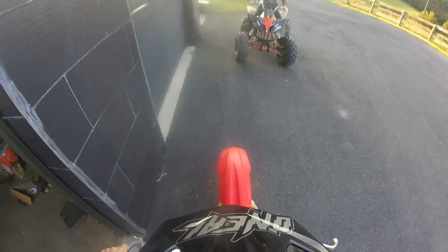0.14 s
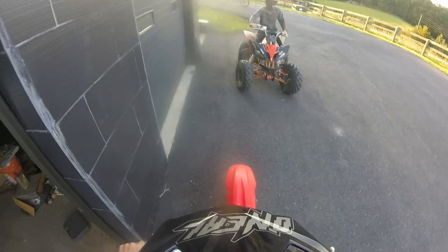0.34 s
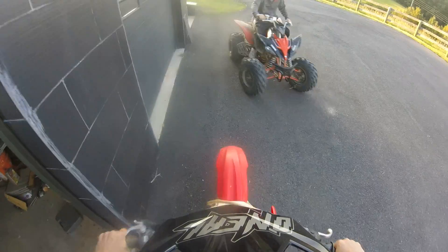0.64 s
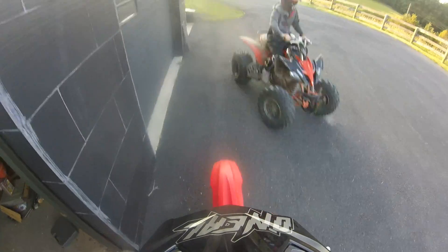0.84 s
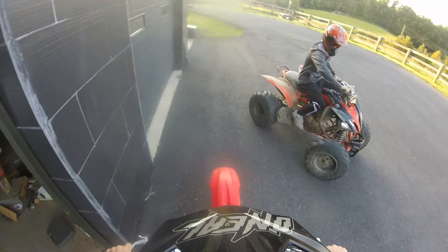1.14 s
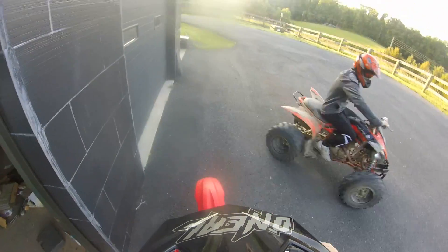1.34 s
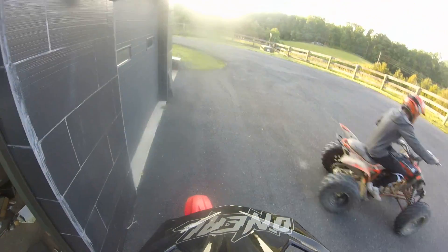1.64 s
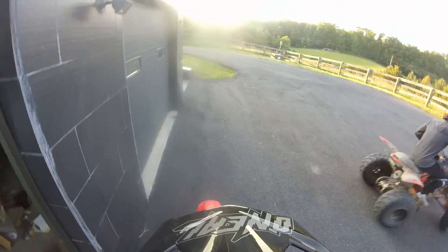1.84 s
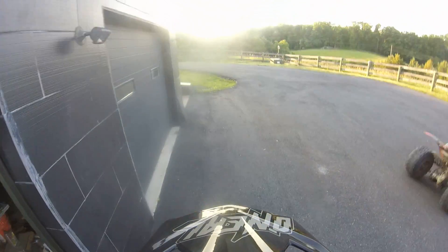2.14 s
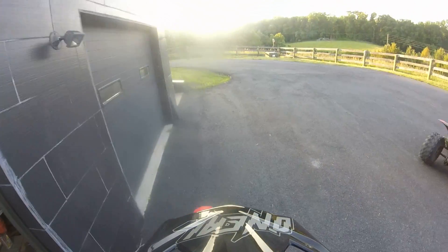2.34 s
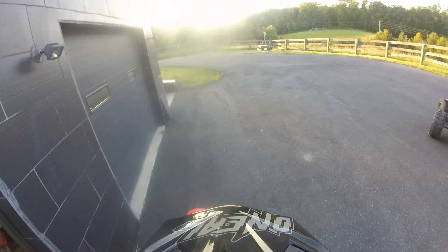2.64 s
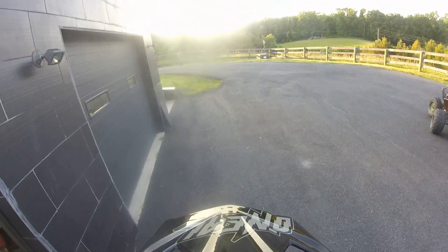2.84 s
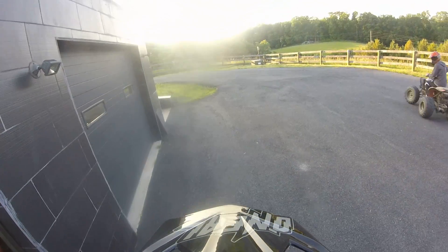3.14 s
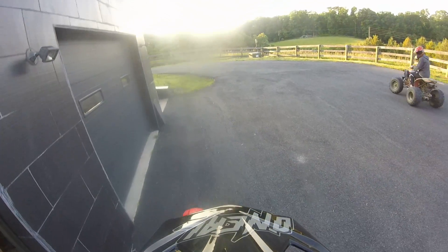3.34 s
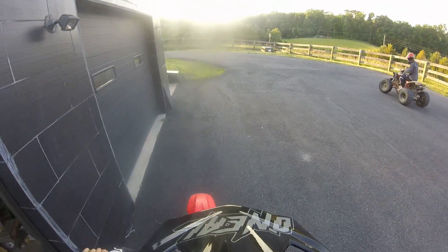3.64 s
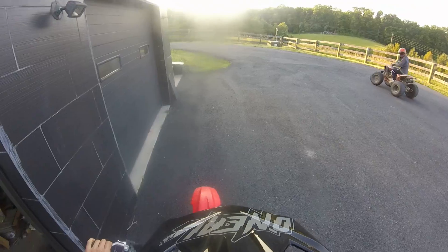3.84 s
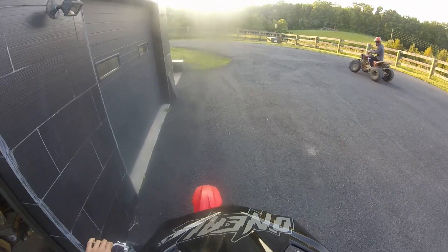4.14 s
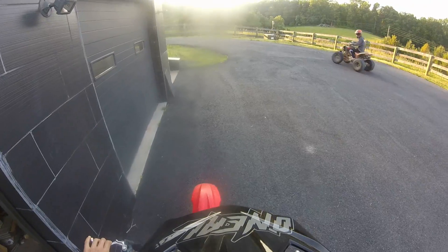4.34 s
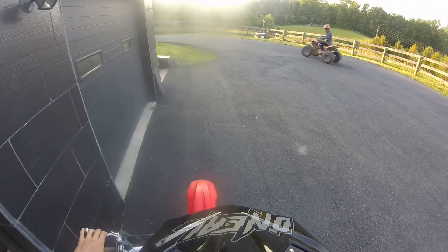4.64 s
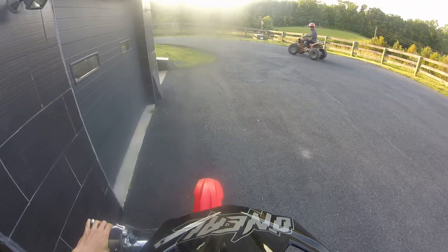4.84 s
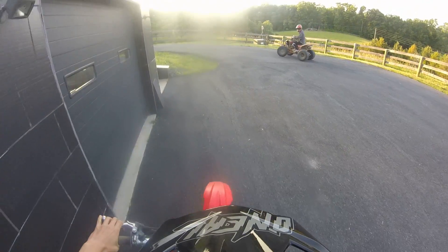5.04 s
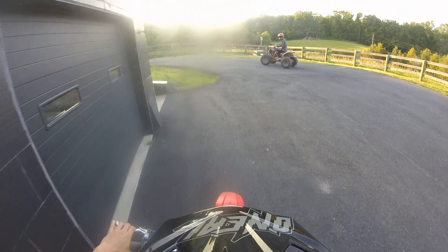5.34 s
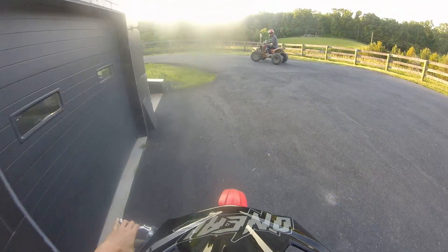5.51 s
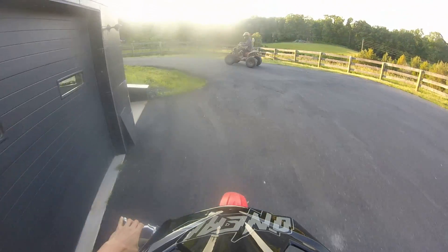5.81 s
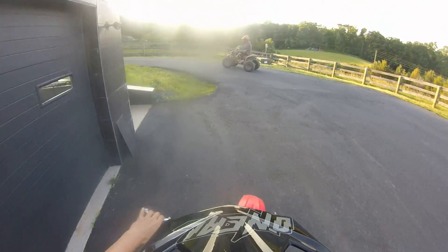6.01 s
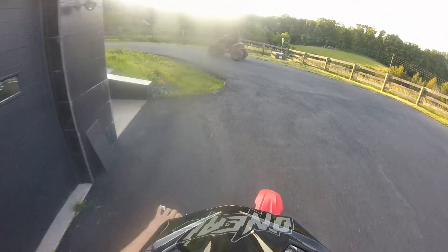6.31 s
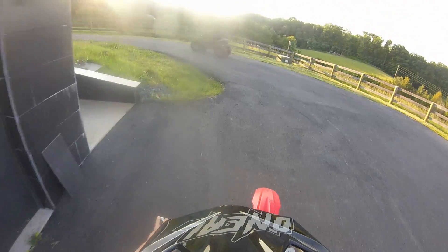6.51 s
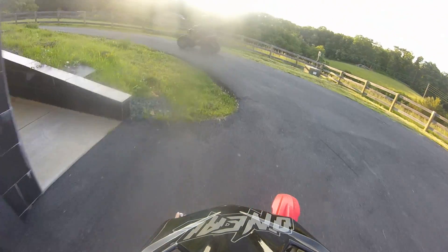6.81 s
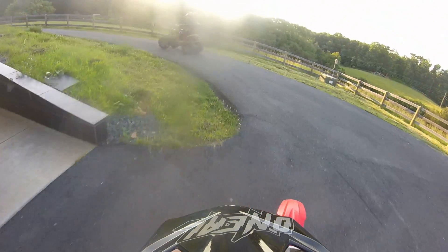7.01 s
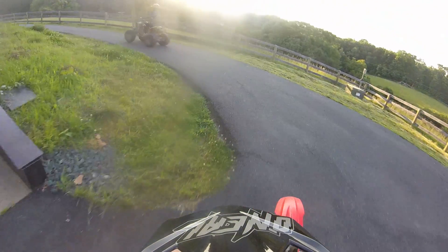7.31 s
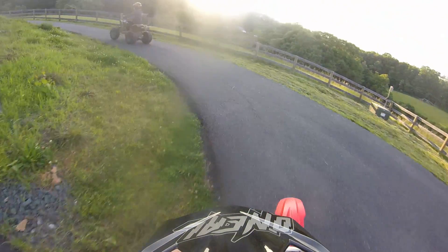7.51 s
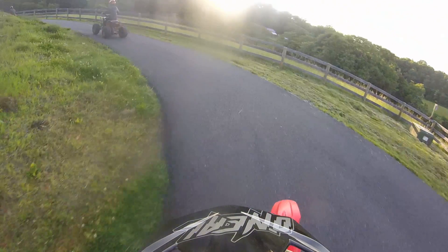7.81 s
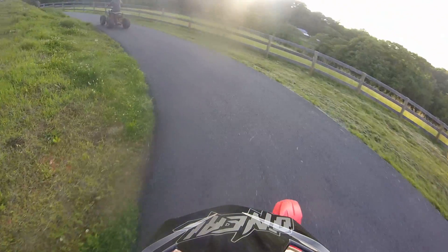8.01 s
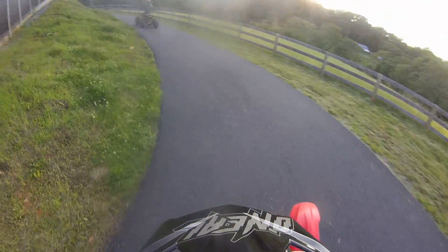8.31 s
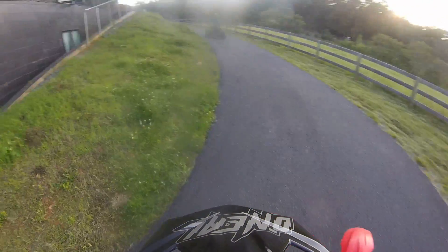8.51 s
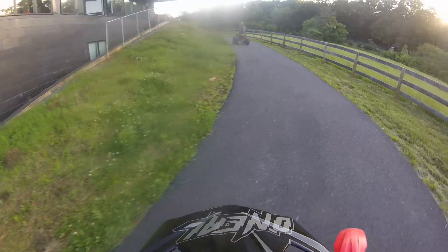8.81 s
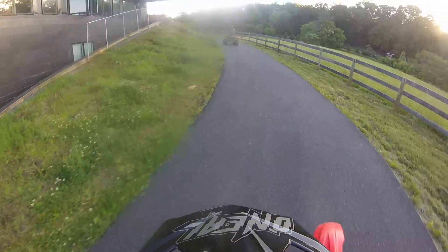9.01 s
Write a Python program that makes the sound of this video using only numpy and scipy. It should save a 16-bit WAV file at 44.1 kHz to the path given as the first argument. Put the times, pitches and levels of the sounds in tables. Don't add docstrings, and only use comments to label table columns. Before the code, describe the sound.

Close, boxy sound from a helmet camera in a sealed housing, beside a wall outdoors. From 0 s a quad thrums low and throbs with clatter and a faint rising whir; tiny cricket chirps at 0.2 and 0.6 s. Lever clanks at 0.1 to 0.5 s, then kick hits from 0.9 s. At 1.0 s the single-cylinder dirt bike fires, with a big blip at 1.2 s, then sags toward a stall while the quad passes, loudest near 1.7 s. A small blip at 2.35 s, a sharp backfire at 2.44 s, a big blip at 2.6 s, a pedal thud near 3 s. From 3.3 s the engine pulls away, growling and knocking with hollow ringing clatter, rising around 4.2 s and again near 6 s; wall echo fades by 7 s. Faint rapid chain slaps 7 to 8.2 s as the engine eases, misfiring, and from 8.4 s it pulls again until the cut. Soft movement thumps throughout.

```python
import sys
import numpy as np
from scipy import signal
from scipy.io import wavfile
from scipy.ndimage import uniform_filter1d

SR = 44100
rng = np.random.default_rng(int(sys.argv[2]) if len(sys.argv) > 2 else 0)


def elevation(decibels):
    levels = np.asarray(decibels, float)
    return 10 ** (levels / 20)


def store_wav(level_fs):
    pcm = np.round(np.clip(np.atleast_2d(level_fs), -1, 1) * 32767)
    wavfile.write(sys.argv[1], SR, pcm.T.astype(np.int16))


N = 403956
T = np.arange(N) / SR

# t/s, starting f/Hz, level/dB
CHIRPS = [
    (.193, 4370, -60),
    (.608, 4420, -56),
]
# t/s, exhaust thrum f/Hz, nearness level/dB
QUAD = [(0, 93.5, -3.5), (.3, 94, -1.6), (1, 105.5, -1), (1.7, 102, 3), (2.2, 99.2, -5), (3, 112.6, -8)]
# t/s, level/dB
MOVEMENTS = [(.01, -43), (.28, -27), (.92, -25.5), (1.25, -35), (1.879, -32.5), (2.401, -37), (3.09, -31),
             (4.2, -49), (5.7, -55), (6.78, -40), (7.12, -53), (7.37, -52), (8.01, -47), (8.49, -37),
             (8.75, -48), (9.15, -39)]
# t/s, peak level/dB, fizz level/dB re peak, low knock level/dB re peak, time to fall 60 dB/s
HITS = [
    (0.08, -36.5, -16, -27, 0.056),
    (0.2375, -34.5, -14, -17, 0.15),
    (0.3316, -27, -13, -32, 0.18),
    (0.457, -35, -13, -25, 0.13),
    (0.8837, -30.5, -17, -18, 0.036),
    (0.9065, -30, -17, -30, 0.094),
    (0.9921, -21, -15, -31, 0.11),
    (2.374, -32, -22, -20, 0.13),
    (2.439, -27, -16, -25, .07),
    (2.962, -32.5, -7, 3.5, 0.19),
]
# t/s, slaps per second/Hz, level/dB
CHAIN = [(6.7, 33.5, -95), (6.95, 34.6, -62), (7.2, 35.5, -49), (7.4, 38, -47), (7.7, 41.5, -48),
         (7.9, 43, -52), (8.05, 43.5, -49), (8.2, 43.8, -66), (8.4, 44, -95)]
# f/Hz, width/Hz, level/dB
CHAIN_RING = [(8300, 1000, -1), (11500, 1500, -13), (6000, 900, 1), (14300, 1200, -24), (3450, 700, 12),
              (7000, 700, -3)]
# t/s, level/dB
BACKFIRE = [
    (2.4382, -21),
    (2.4432, -15.5),
    (2.466, -28),
]
# f/Hz, width/Hz, level/dB
BACKFIRE_RING = [(1349, 150, -1), (1570, 200, -5), (690, 410, -13), (2610, 850, -15)]

# f/Hz, level/dB
HOUSING = [(300, -14.5), (700, -11), (1050, -17), (1250, -9.5), (1380, 0), (1540, -3.5), (1700, -9.5),
           (2070, -16.5), (2500, -8.5), (2700, -9.5), (3050, -11.5), (3900, -22), (4700, -37), (16000, -99)]
# f/Hz, level/dB
HOUSING_TOP = [(2000, -70), (3600, -3), (4600, -9), (5200, -7.5), (5900, 4.5), (6600, -4.5), (8200, -7),
               (9500, -11), (12000, -20.5), (15000, -32), (16000, -84)]
# f/Hz, level/dB
HOUSING_CLANK = [(300, -18.5), (850, -16.5), (1100, -17), (1450, 0), (1700, -12.5), (2050, -20),
                 (2480, -5.5), (2750, -8), (3050, -4), (3400, -14.5), (3850, -12.5), (4300, -28),
                 (5000, -66), (16000, -99)]

# opening t/s, held/s, exhaust level/dB, clatter level/dB, speed gain/Hz
BLIPS = [
    (0.991, 0.091, -27.5, -31, 10.3),
    (1.226, 0.079, -20.5, -19.5, 31),
    (2.355, .11, -29.5, -39, 13),
    (2.615, 0.081, -23, -27.5, 30.8),
]
# start t/s, length/s
PULLS = [
    (3.32, 4.42),
    (8.385, 1.2),
]
# t/s, firings per second/Hz
RIDE_SPEED = [(3.36, 32.96), (3.55, 43.47), (3.97, 43.95), (4.25, 51.05), (4.75, 46.82), (5.05, 47.72),
              (5.56, 47.38), (5.77, 52.25), (6.1, 55.91), (6.56, 54.94), (6.93, 51.3), (7.25, 53.1),
              (7.76, 48.94), (8.1, 40.3), (8.4, 41.65), (8.59, 43.5), (8.68, 38.22), (9.16, 41.22)]
# t/s, level/dB
EFFORT = [(3.36, -0.5), (4, -0.5), (4.3, 0), (5.4, -0.5), (5.7, 0.2), (6.4, 0), (6.8, 0.5), (7.7, -0.5),
          (8.2, -2), (9.16, -1.5)]
# t/s, level/dB
ROAD_RUSH = [(3.4, -2), (5.3, -1), (5.8, 3), (6.6, 1.5), (7.2, -0.5), (8.2, -0.5), (9.16, -1.5)]
# t/s, level/dB
MISFIRES = [(3.128, -8), (3.232, -9), (3.709, -16), (3.857, -12), (3.88, -12), (4.045, -6), (4.13, -9),
            (4.315, -8), (4.897, -9), (4.939, -12), (7.827, -11), (7.982, -7), (8.045, -9), (8.103, -9),
            (8.154, -10)]
# f/Hz, level/dB
PIPE_SHUT = [(40, -55), (70, -30), (110, 2), (150, 8), (190, 9.5), (260, -6), (330, -32), (420, 0),
             (1500, -99)]
# f/Hz, level/dB
PIPE_UPPER = [(250, -39), (400, -16), (470, 7), (530, 0), (590, -5), (690, -3), (790, -6), (940, 2.5),
              (1050, -15), (2500, -99)]
# f/Hz, width/Hz, level/dB
HONK = [(238.7, 29, 4.5), (310, 28, -2), (292, 80, -2)]
# f/Hz, width/Hz, level/dB
KNOCK = [(1393, 75, 11), (1530, 115, 11.5), (2630, 330, -7.5)]
ORDER_SPEEDS = [42, 47.5, 51.8, 55]
# multiple of the firing rate, level/dB
ORDERS_SLOW = [(1, -13), (2, -5), (3, -14), (4, -2), (5, 0), (6, -2), (7, -7), (8, -16), (9, -11),
               (10, -11), (11, -15), (12, -14.5), (13, -12.5), (14, -15.5), (15, -17.5), (16, -25),
               (17, -18.5), (18, -21), (19, -20), (20, -21)]
ORDERS_MID = [(1, -7), (2, -6), (3, -102), (4, 2.5), (5, 5.5), (6, 3.5), (7, 0.5), (8, -10.5), (9, -8),
              (10, 1.5), (11, -7), (12, -9), (13, -58), (14, -1), (15, -2), (16, -12), (17, -14), (18, -36),
              (19, -13.5), (20, -12)]
ORDERS_BRISK = [(1, -8), (2, -6), (3, -54), (4, 4.5), (5, 1.5), (6, 9.5), (7, -5.5), (8, -5.5), (9, 3),
                (10, 9), (11, -22), (12, -5), (13, -7.5), (14, 3), (15, 2), (16, -7), (17, -5.5), (18, -14),
                (19, -17), (20, -38)]
ORDERS_FAST = [(1, -3), (2, -13), (3, -22.5), (4, 4), (5, 2), (6, -7), (7, -7), (8, -20), (9, 6.5),
               (10, -3.5), (11, -26), (12, -1), (13, -4.5), (14, -16), (15, -32), (16, -25), (17, -5),
               (18, -7), (19, -8), (20, -30)]
# f/Hz, level/dB
FRAME = [(30, -57), (40, -56), (47, -41), (55, -37), (70, -45), (86, -41), (101, -44.5), (111, -58)]
# t/s, level/dB
SHAKE_DIPS = [(2.799, -12), (3.54, -4), (4.09, -5), (4.82, -28), (6.91, -29)]
# t/s, level/dB
WALL = [(1, -14), (4.3, -14.5), (5, -7.5), (6.55, -7.5), (6.95, -16), (7.5, -24.5)]

COASTING, BLIPPING, PULLING = (.25, .17, .04, .27), (.9, .6, .93, .35), (.97, .05, .008, .25)
# when lugging at low speed, off the throttle in gear, per Hz above 35 Hz out of gear
LUGGING, OVERRUN, FREE_PER_HZ = (0, .05, .012, .45), (.3, .16, .02, .2), (.008, .004, .003, 0)
CLUTCH_S, CRANK_AT_CLUTCH = 3.36, .11


def evened(x):
    return x / np.sqrt(np.mean(x ** 2) + 1e-20)


def ramp(x):
    return np.clip(x, 0, 1)


def curves(rows):
    s, *columns = np.transpose(rows)
    return [np.interp(T, s, column) for column in columns]


def noise():
    return rng.standard_normal(N)


def clicks(at, size):
    return np.bincount(np.clip(at, 0, N - 1).astype(int), size, N)


def colour(x, points):
    hz, db = np.transpose(points)
    bins = abs(np.fft.fftfreq(16384, 1 / SR))
    log_gain = np.log(elevation(np.interp(np.log(bins + 1), np.log(hz), db)))
    taps = np.fft.ifft(np.exp(np.conj(signal.hilbert(log_gain)))).real[:4096]
    return signal.oaconvolve(x, taps / np.linalg.norm(taps))[:len(x)]


def resonate(x, hz, width):
    turn = np.exp(2j * np.pi * np.cumsum(hz * np.ones(len(x))) / SR)
    r = np.exp(-np.pi * width / SR)
    smooth = signal.lfilter([(1 - r) ** 2], [1, -2 * r, r * r], x / turn)
    return 2 * (turn * smooth).real


def ring_all(x, tones):
    return evened(sum(elevation(db) * resonate(x, hz, width) for hz, width, db in tones))


def cricket():
    out = np.zeros(N)
    t = np.arange(round(.117 * SR)) / SR
    notes = np.sin(np.pi * 51.5 * t) ** 6
    swell = (t + .01) / .035 * np.exp(-t / .036)
    for s, hz, db in CHIRPS:
        pitch = hz + 150 * np.sin(np.pi * t / .11)
        tone = np.sin(2 * np.pi * np.cumsum(pitch) / SR)
        out[round(s * SR):][:len(t)] += 4 * elevation(db) * swell * notes * tone
    return out


def quad():
    hz, near_db = curves(QUAD)
    period_s = .47
    blip = np.sin(np.pi * (T - .05) / period_s) ** 2
    thrum_db = -39.5 + .5 * blip + near_db
    clatter_db = -45.5 + 2.5 * blip + 1.2 * near_db
    whir_db = -60 + 8.5 * blip + .27 * near_db
    throb = 3.15 + np.exp(-(np.cumsum(hz) / SR / 4 % 1) / .087)
    thrum = evened(resonate(throb * noise(), hz, 24) + .38 * resonate(noise(), 2 * hz, 135))
    clatter = evened(colour(throb * noise(), HOUSING_CLANK)) + elevation(-16) * colour(noise(), HOUSING_TOP)
    clatter += elevation(-25) * np.gradient(noise())
    rising_hz = 262 + 190 * ((T - .05) % period_s)
    whir = evened(resonate(noise(), rising_hz, 8.8) + resonate(noise(), rising_hz + 40.6, 22))
    return elevation(thrum_db) * thrum + elevation(clatter_db) * clatter + elevation(whir_db) * whir


def movements():
    s, db = np.transpose(MOVEMENTS)[:, :, None]
    rise_db_per_s, fall_db_per_s, sway_db = 130, 51, -51
    lump_db = db - np.maximum((s - T) * rise_db_per_s, (T - s) * fall_db_per_s)
    return elevation(np.maximum(lump_db.max(0), sway_db)) * evened(resonate(noise(), 5.8, 26))


def hits():
    s, db, fizz_db, knock_db, t60 = np.transpose(HITS)[:, :, None]
    age = T[:7 * SR // 2] - s
    rise = ramp(age / .003)
    burst = elevation(db - 60 * np.maximum(age, 0) / t60) * rise * noise()[:age.shape[1]]
    clank = colour(burst.sum(0), HOUSING_CLANK)
    fizz = colour((elevation(fizz_db) * burst).sum(0), HOUSING_TOP)
    knock = resonate((elevation(knock_db) * burst).sum(0), 250, 980)
    ring = clank + fizz + 5.4 * knock
    return np.pad(ring, (0, N - len(ring)))


def chain():
    hz, db = curves(CHAIN)
    turns = np.cumsum(hz) / SR
    turns += 300 - turns[round(7.221 * SR)]
    size = elevation(1.3 * rng.standard_normal(1000))[turns.astype(int)]
    slaps = size * np.exp(-(turns % 1) / .14) * noise()
    return elevation(db) * ring_all(slaps, CHAIN_RING)


def backfire():
    s, db = np.transpose(BACKFIRE)
    pops = clicks(s * SR, -elevation(db))
    return sum(elevation(d) * SR / (.84 * w) * resonate(pops, f, w) / 2 for f, w, d in BACKFIRE_RING)


def frame_shake_db(hz, blip, pull):
    f, db = np.transpose(FRAME)
    push_db = .5 * blip - .5 * (1 - pull)
    dips_db = sum(d * ramp(1 - abs(T - s) / .095) for s, d in SHAKE_DIPS)
    return np.interp(hz, f, db) + push_db, np.interp(2 * hz, f, db) + push_db + dips_db


def controls():
    s, held, gulp_db, rap_db, gain_hz = np.transpose(BLIPS)[:, :, None]
    age, after = T - s, np.maximum(T - s - held, 0)
    stall_hz, kicked_hz, sag_s, lead_s, lag_s = 24.9, 16.3, .48, .02, .045
    spin = ramp((age + lead_s) / (held + lead_s + lag_s)) * np.exp(-np.maximum(after - lag_s, 0) / sag_s)
    free_hz = stall_hz + kicked_hz * np.exp(-np.maximum(T - 1, 0) / sag_s) + (gain_hz * spin).sum(0)
    ride_hz, effort_db = curves(RIDE_SPEED) + curves(EFFORT)
    gear = ramp((T - CLUTCH_S) / .15 + 1)
    hz = free_hz + gear * (ride_hz - free_hz)

    opened = ramp(age / .025) * np.exp(-after / .02)
    build = ramp(age / held) ** 2 * np.exp(-after / .043)
    blip = (ramp(age / .02) * ramp(1 - after / .05)).max(0)
    pull = sum(ramp((T - a) / .055) * ramp((a + long - T) / .055 + 1) for a, long in PULLS)
    lug = pull * ramp((48.5 - hz) / 5)
    fast = hz - 45
    coasting, blipping, pulling, lugging, overrun, per_hz = np.array(
        [COASTING, BLIPPING, PULLING, LUGGING, OVERRUN, FREE_PER_HZ])[:, :, None]
    state = coasting + blip * (blipping - coasting) + pull * (pulling - coasting)
    state = state + lug * lugging + gear * (1 - pull) * overrun
    state += per_hz * np.maximum(fast + 10, 0) * (1 - blip) * (1 - gear)

    coast_db = -38 + .2264 * fast
    exhaust = elevation(coast_db + pull * (-33 - coast_db) + gear * effort_db) + (elevation(gulp_db) * opened).sum(0)
    clatter_db = -35.5 + .2938 * fast + .1 * pull + 2.5 * lug + .5 * gear * effort_db
    clatter = elevation(clatter_db) + (elevation(rap_db) * build).sum(0)
    upper_db = -10.5 + pull * (3.5 + .2965 * fast) - 6 * ramp(blip - build.max(0))
    fizz = clatter * elevation(-21.5 - 3 * lug + gear * curves(ROAD_RUSH)[0])
    return hz, (exhaust, upper_db, clatter, fizz), frame_shake_db(hz, blip, pull), state


def exhaust_tones(turns, hz):
    tables = np.array([ORDERS_SLOW, ORDERS_MID, ORDERS_BRISK, ORDERS_FAST])[:, 2:]
    half = np.log(elevation(np.r_[-14, -16, -16, tables[0, :, 1], np.linspace(-26, -45, 12)]))
    lag = signal.hilbert(np.r_[half, half[-2:0:-1]]).imag[3:21, None]
    size = np.array([np.interp(hz, ORDER_SPEEDS, elevation(db)) for db in tables[:, :, 1].T])
    order = tables[0, :, :1]
    waves = -size * np.cos(2 * np.pi * order * (turns - .07) - lag)
    parts = order[:, 0] < 9, order[:, 0] >= 9
    return [np.sqrt(2) * waves[part].sum(0) / np.linalg.norm(size[part], axis=0) for part in parts]


def engine():
    hz, levels, (once_db, twice_db), (load, uneven, honk, knocking) = controls()
    exhaust_level, upper_db, clatter_level, fizz_level = levels
    turns = np.cumsum(hz) / SR
    turns += CRANK_AT_CLUTCH - turns[round(CLUTCH_S * SR)]

    at = np.flatnonzero(np.diff(np.floor(turns)))
    luck = rng.standard_normal((1000, 3))[:len(at)].T
    force_db = 7 * uneven[at] * luck[0]
    for s, db in MISFIRES:
        force_db[np.argmin(abs(at / SR - s))] = db
    late_s = .002 * uneven[at] * luck[1]
    cycle = np.maximum(np.searchsorted(at, np.arange(N)) - 1, 0)
    force = uniform_filter1d(elevation(force_db)[cycle], size=150)

    lower, higher = exhaust_tones(turns - hz * uniform_filter1d(late_s[cycle], size=300), hz)
    pops = -clicks(at + late_s * SR, elevation(force_db) * np.sqrt(SR / hz[at]))
    pipe = np.sqrt(load) * force * lower + np.sqrt(1 - load) * colour(pops, PIPE_SHUT)
    puff = elevation(.52 * force_db[cycle]) * np.exp(-(turns % 1) / 1.15)
    gulp = (.5 + puff) * noise()
    intake = ring_all(gulp, HONK)
    upper = np.sqrt(1 - honk) * force * higher + np.sqrt(honk) * evened(colour(gulp, PIPE_UPPER))
    low = np.sqrt(1 - honk) * pipe + np.sqrt(honk) * intake + elevation(upper_db) * upper

    slap = np.exp(-((turns + .18) % 1) / .2)
    blows = clicks(at - .18 * SR / hz[at] + 25 * luck[1], elevation(1.2 * luck[2])) + .025 * slap * noise()
    knock = ring_all(blows, KNOCK)
    rattle = evened(colour((.57 + .5 * puff + .12 * slap) * noise(), HOUSING))
    clatter = np.sqrt(knocking) * knock + np.sqrt(1 - knocking) * rattle
    fizz = evened(colour((.69 + .5 * puff + .5 * slap) * noise(), HOUSING_TOP))

    shake = elevation(once_db) * np.sin(2 * np.pi * turns) + elevation(twice_db) * np.sin(4 * np.pi * turns + 1)
    mix = exhaust_level * low + fizz_level * fizz + clatter_level * clatter + np.sqrt(2) * shake
    return mix * ramp((T - .98) / .056)


def scene():
    background = cricket() + quad() + movements()
    bike = engine()
    wall = elevation(curves(WALL)[0]) * np.interp(T - .011, T, bike)
    return (background + hits() + chain() + backfire() + bike + wall)[None]


def roll_off(x):
    return signal.sosfilt(signal.butter(12, 15280, fs=SR, output="sos"), x)


def record(dry):
    low_pass = signal.firwin(255, 15200, window=("kaiser", 8), fs=SR)
    fade = ramp((T[-1] - T) / .003)
    mix = signal.oaconvolve(dry * fade, low_pass[None], "same")
    return roll_off(mix)


dry = scene()
out = record(dry)
store_wav(out)
```